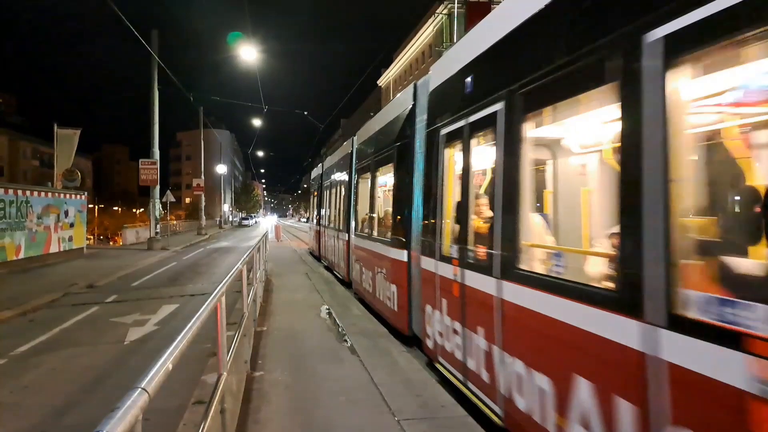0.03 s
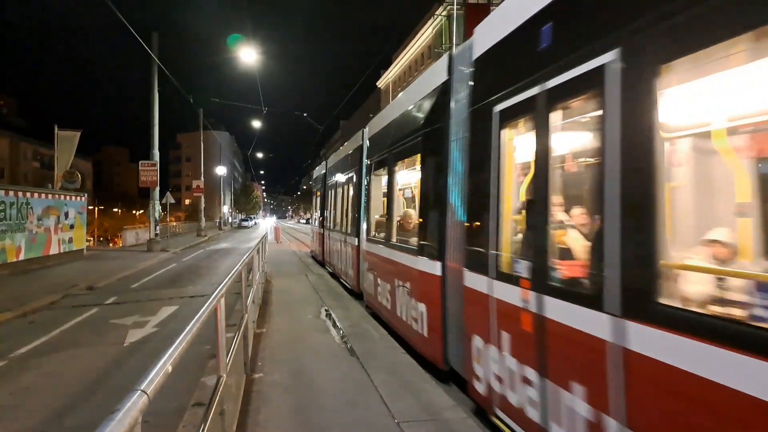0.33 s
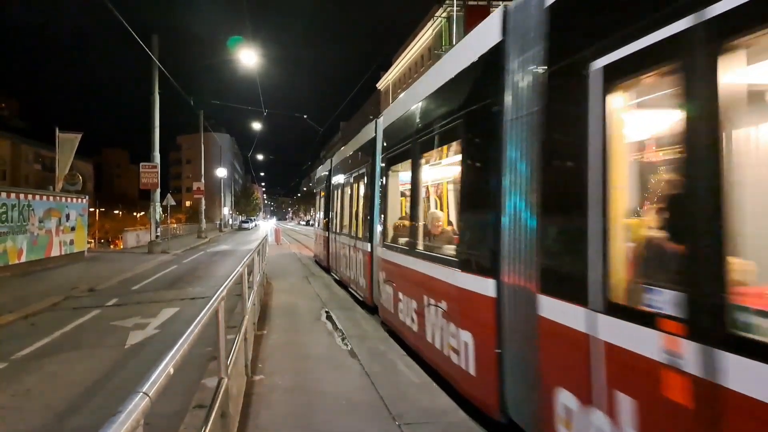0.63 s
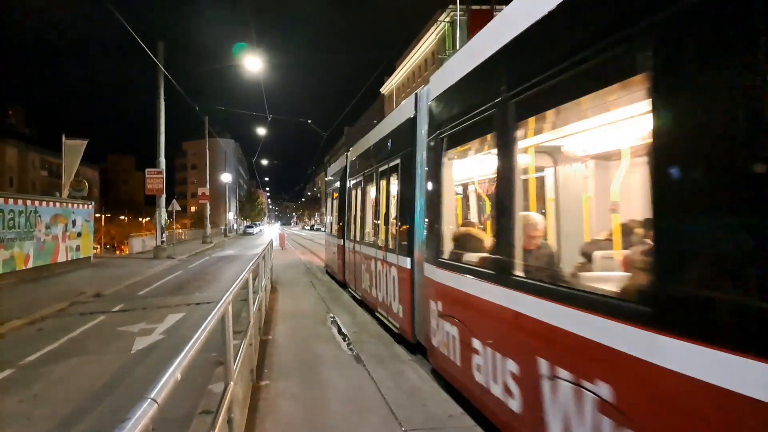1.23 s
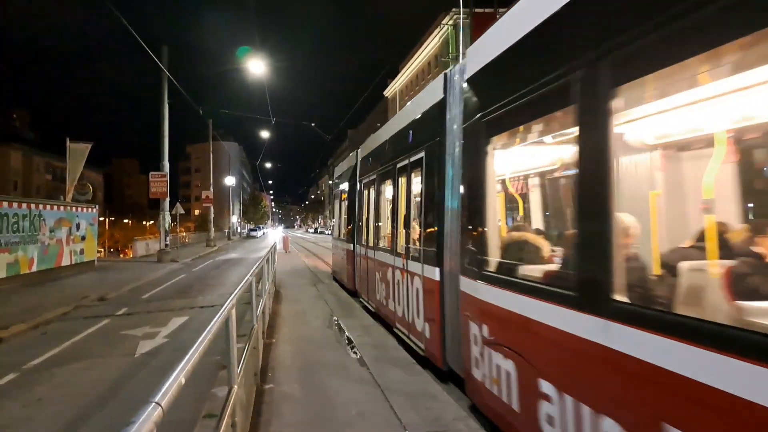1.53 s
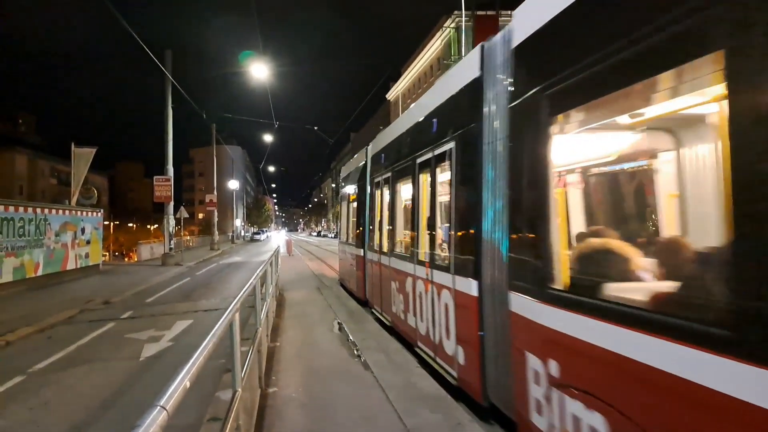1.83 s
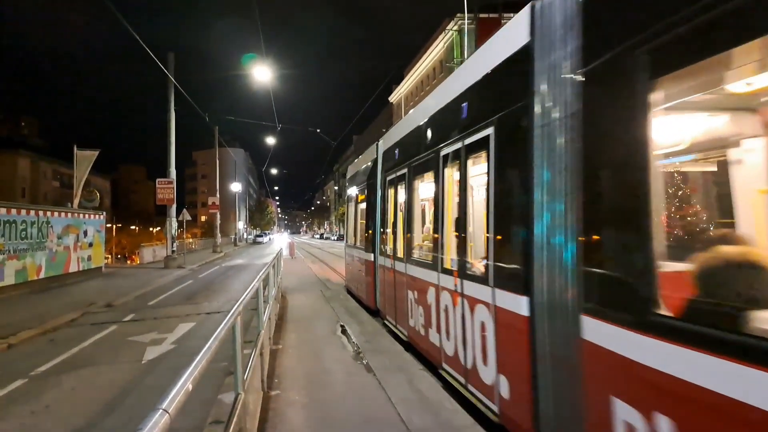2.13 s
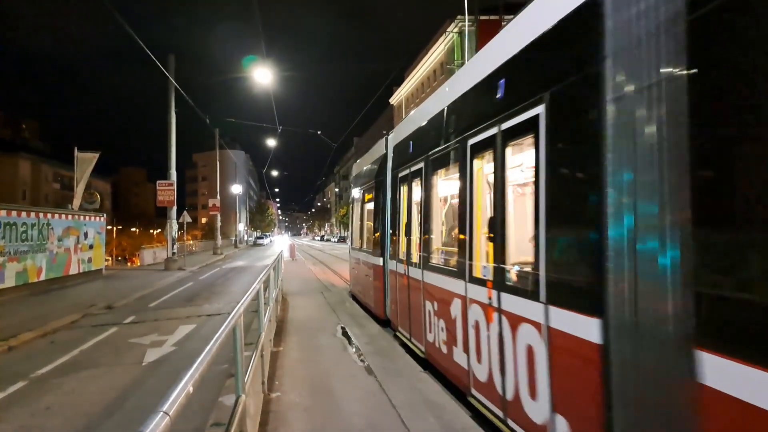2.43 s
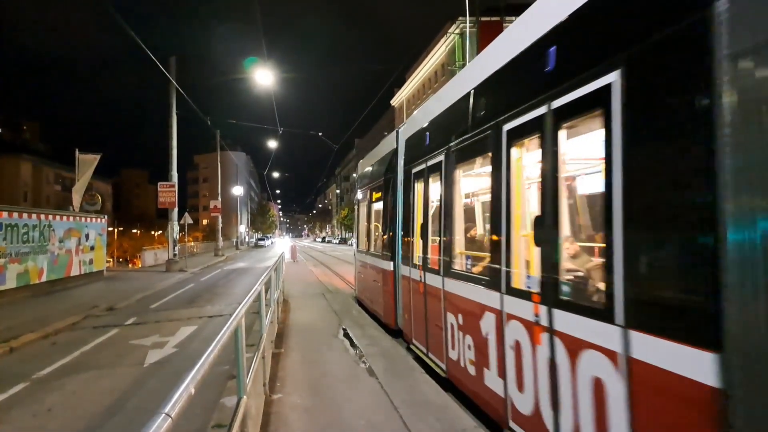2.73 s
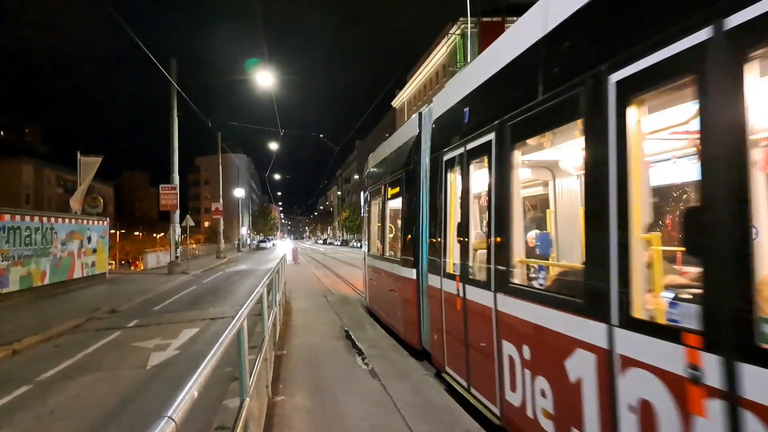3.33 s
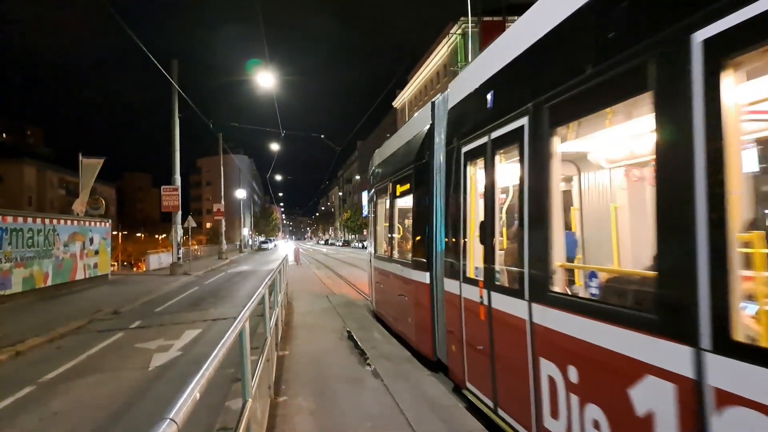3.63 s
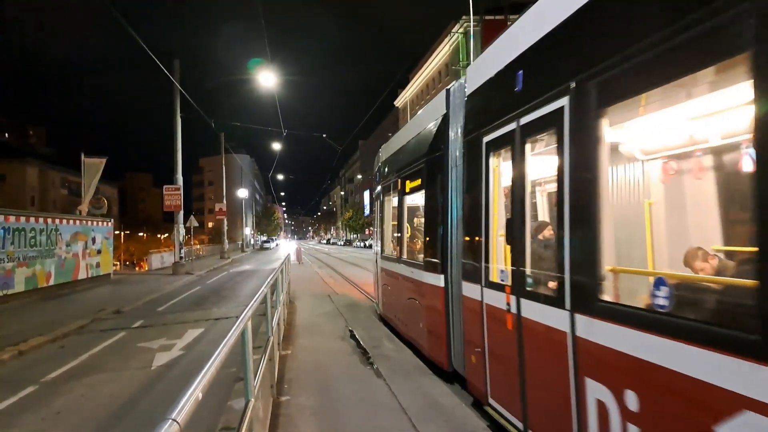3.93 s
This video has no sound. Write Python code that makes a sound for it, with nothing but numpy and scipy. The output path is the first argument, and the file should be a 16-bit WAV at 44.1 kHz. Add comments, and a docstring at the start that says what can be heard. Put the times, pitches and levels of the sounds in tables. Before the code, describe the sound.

A tram rolls past close by on a quiet street at night, rumbling and hissing over a motor hum. Its wheels knock a few times, then a thin, fluttering squeal and high sizzle build over low throbs.

```python
"""A long tram rolls past close by in a quiet street at night.
The track rumbles, the wheels roar on the hissing rail and the motor hums. A set of wheels knocks
a few times as it draws level, and the car body booms in throbs. The flanges (the wheels' guiding rims)
scrape along the rail and rub the wheels into a thin, fluttering squeal with a high sizzle."""
import sys
import numpy as np
from scipy import signal
from scipy.fft import rfft, irfft
from scipy.io import wavfile

SR = 44100
rng = np.random.default_rng(int(sys.argv[2]) if len(sys.argv) > 2 else 0)


def wav_out(sig):
    """Save sig, one row per channel (or a flat mono array), as 16-bit PCM at SR to the path in sys.argv[1]."""
    wavfile.write(sys.argv[1], SR, np.round(np.clip(np.atleast_2d(sig).T, -1, 1) * 32767).astype(np.int16))


N = 4 * SR


def undb(db):
    """Turn decibels into a gain."""
    return 10 ** (np.asarray(db) / 20)


def unit(x):
    """Scale a signal to an average power of 1."""
    return x / np.sqrt(np.mean(np.abs(x) ** 2))


def swell(curve):
    """Gain over time through points of t/s, level/dB."""
    return undb(np.interp(np.arange(N) / SR, *np.array(curve).T))


def drift(rate_hz):
    """A smooth random wobble of typical size 1, mostly slower than rate_hz."""
    f = np.fft.rfftfreq(N, 1 / SR)
    return unit(irfft(rfft(rng.standard_normal(N)) * (f > 0) / (1 + (f / rate_hz) ** 4), N))


def pan(db):
    """Left and right gains, with the left louder by db."""
    return unit(undb(np.array([[db], [-db]]) / 2))


def noise(spectrum, likeness=0):
    """Complex stereo noise (abs gives its strength); likeness near 1 makes both sides alike."""
    a, b = rfft(rng.standard_normal((2, N)))
    mid, side = a * np.sqrt(1 + likeness), b * np.sqrt(1 - likeness)
    return unit(np.fft.ifft(np.array([mid + side, mid - side]) * spectrum, N)) * np.sqrt(2)


def resonances(modes):
    """A spectrum with a peak for each mode (a pitch at which a part likes to ring)."""
    f = np.fft.rfftfreq(N, 1 / SR) + 1
    powers = (undb(db) ** 2 / width / (1 + ((f - hz * hz / f) / width) ** 2) ** 2
              for hz, width, db in modes)
    return np.sqrt(sum(powers))


def rush(colour, curve, likeness, pan_db, flicker_db, rate_hz):
    """Contact noise whose level flickers with the roughness of the rail."""
    hz, db = np.array(colour).T
    spectrum = undb(np.interp(np.log(np.fft.rfftfreq(N, 1 / SR) + 1), np.log(hz), db))
    return noise(spectrum, likeness).real * swell(curve) * pan(pan_db) * undb(flicker_db * drift(rate_hz))


def sing(modes, curve, steady, pan_db, flutter_db):
    """Rubbing makes a wheel ring and partly evens out its swing (more so as steady rises)."""
    ring = noise(resonances(modes))
    evened = unit(ring.real / np.abs(ring) ** steady)
    return evened * swell(curve) * pan(pan_db) * undb(flutter_db)


def tone(hz, curve, waver, flicker_db):
    """A pure tone that wavers in pitch and flickers in level."""
    phase = 2 * np.pi * np.cumsum(hz * (1 + waver * drift(9))) / SR
    return np.sqrt(2) * np.sin(phase) * swell(curve) * undb(flicker_db * drift(19.5))


def rolling():
    """As the tram rolls, the track bed rumbles, the wheels roar and the rail hisses."""
    # tone colour of each noise: f/Hz, relative level/dB
    rumble = [(20, -28), (30, -12), (42, -6), (60, 1.5), (95, -2.5), (130, -0.5), (165, -5.5), (210, -6),
              (260, -11), (320, -11.5), (450, -24), (700, -34), (1400, -71.5)]
    roar = [(150, -13), (315, 4.5), (400, 0.5), (490, -1.5), (570, 0), (630, 2), (730, -3.5), (900, -3),
            (1250, -10.5), (1650, -7.5), (2100, -10), (2700, -13), (3300, -18), (6000, -30.5),
            (12000, -48.5)]
    hiss = [(2000, -17), (3300, -13), (3900, 3), (4350, 1), (4900, -7.5), (5600, -10.5), (6400, -25),
            (8000, -25), (10000, -30.5), (12500, -23), (15500, -37)]
    # their loudness over time: t/s, level/dB
    rumble_db = [(0, -22), (.7, -23), (1.5, -23.5), (1.85, -23), (2.2, -22), (3, -23), (3.4, -25.5),
                 (4, -25.5)]
    roar_db = [(0, -32), (.6, -34.5), (1.1, -35.5), (1.8, -32.5), (2.5, -35), (3.1, -37), (4, -39)]
    hiss_db = [(0, -38), (.2, -39), (.5, -44.5), (1.25, -46.5), (1.5, -44), (2.5, -46), (4, -50)]
    return (rush(rumble, rumble_db, likeness=.9, pan_db=.5, flicker_db=1.3, rate_hz=8.2)
            + rush(roar, roar_db, likeness=-.022, pan_db=.7, flicker_db=.5, rate_hz=4.7)
            + rush(hiss, hiss_db, likeness=.042, pan_db=6.5, flicker_db=.5, rate_hz=9.9))


def motor():
    """The motor hums; a higher whine fades as a set of wheels moves away."""
    # loudness of hum and whine: t/s, level/dB
    hum_db = [(0, -26.5), (.12, -25.5), (.25, -41), (.42, -32), (.9, -36), (1.2, -32.5), (1.5, -35),
              (1.7, -27), (1.95, -28), (2.15, -51), (2.7, -43.5), (3.05, -30), (3.25, -50), (4, -60)]
    whine_db = [(0, -33.5), (.15, -39.5), (.3, -45), (.7, -54), (4, -87)]
    return (tone(hz=261.5, curve=hum_db, waver=.0086, flicker_db=2)
            + tone(hz=484, curve=whine_db, waver=.0194, flicker_db=3))


def leaving_wheels():
    """At the start, wheels that are moving away ring and quickly fade."""
    # wheel modes: f/Hz, width/Hz, relative level/dB
    modes = [(4322, 31, 0), (4440, 79, -8)]
    # their fade: t/s, level/dB
    ring_db = [(0, -46), (.1, -41), (.3, -54), (.5, -64), (4, -80)]
    return sing(modes, ring_db, steady=.2, pan_db=0, flutter_db=.92 * drift(14))


def knocks():
    """A passing set of wheels gives dull knocks, each a short burst of low noise."""
    # knocks: t/s, level/dB, f/Hz
    hits = [(.66, -26.5, 335), (.725, -30, 335), (1.624, -18, 260), (1.794, -14.5, 172),
            (1.914, -17.5, 122), (2.292, -20.5, 295)]
    rise_s, decay_s, width_share = .012, .016, .37
    t, total = np.arange(N) / SR, 0
    for at, db, hz in hits:
        band = noise(resonances([(hz, hz * width_share, 0)]), likeness=.83)
        evened = unit(band.real / np.abs(band) ** .5)
        rise = np.clip((t - at) / rise_s, 0, 1)
        decay = np.exp(-np.maximum(t - at - rise_s, 0) / decay_s)
        total += evened * rise * decay * undb(db)
    return total


def flanges():
    """Flanges scrape along the rail and set the wheels squealing, fluttering as they grip and slip."""
    # tone colour of the scrape: f/Hz, relative level/dB
    scrape = [(2000, 1), (3500, -9.5), (4700, -1.5), (5400, -1.5), (6300, -13), (7700, -21), (8500, -13.5),
              (9200, -20), (12000, -12), (16000, -33)]
    # wheel modes that sing together: f/Hz, width/Hz, relative level/dB
    squeal = [(2774.3, 45, -4), (2689, 35, -14)]
    octave = [(5552, 52, -4.5), (5498, 38, -9.5), (5653, 35, -12), (4650, 43, -19.5)]
    shriek = [(4173, 146, 5), (6970, 190, -17)]
    rub = [(2472, 93, 2), (3330, 120, -1), (3425, 60, -6)]
    grind = [(1668, 92, 4), (1562, 61, 1)]
    top_ring = [(11102, 35, -5), (11440, 55, 4), (11200, 120, 7)]
    whistle = [(12760, 60, -7), (12900, 50, -5), (13030, 170, 0)]
    # loudness of each over time: t/s, level/dB
    scrape_db = [(0, -78), (1.3, -55), (1.45, -44.5), (2.4, -43), (2.95, -36), (3.4, -37), (4, -37)]
    squeal_db = [(0, -51.5), (1.36, -63), (1.44, -41), (1.55, -34), (1.85, -34.5), (2.17, -33), (2.33, -34),
                 (2.5, -31), (2.82, -33), (2.92, -41), (3.2, -33.5), (3.45, -31), (3.58, -39), (4, -47.5)]
    octave_db = [(0, -78), (1.3, -62), (1.47, -48), (1.8, -44), (2.3, -51), (2.65, -47), (3, -35.5),
                 (3.3, -43.5), (3.6, -36), (3.85, -34), (4, -43)]
    shriek_db = [(0, -63), (2, -55), (2.16, -35.5), (2.5, -50.5), (2.85, -46), (3, -38.5), (3.3, -42),
                 (3.6, -38.5), (3.8, -42), (3.95, -31.5), (4, -39)]
    rub_db = [(0, -77), (2.45, -58), (2.7, -42), (3.2, -41.5), (3.55, -50), (4, -50)]
    grind_db = [(0, -56), (2.45, -53), (2.75, -47), (3.15, -41.5), (3.5, -44.5), (3.85, -45), (4, -37.5)]
    top_ring_db = [(0, -88), (1.9, -66), (2.33, -46), (2.45, -64), (2.7, -66), (3.1, -59), (3.7, -60),
                   (4, -63)]
    whistle_db = [(0, -90), (1.25, -85), (1.45, -60), (1.75, -50.5), (2.1, -54), (2.6, -60), (2.71, -48),
                  (2.88, -68), (3.2, -57), (3.6, -69), (4, -68)]
    grip = drift(45)  # squeal and rub flutter together
    return (rush(scrape, scrape_db, likeness=0, pan_db=2.5, flicker_db=1.1, rate_hz=40)
            + sing(squeal, squeal_db, steady=.28, pan_db=5.5, flutter_db=1.8 * grip)
            + sing(octave, octave_db, steady=.19, pan_db=9.5, flutter_db=1.5 * drift(5.3))
            + sing(shriek, shriek_db, steady=.067, pan_db=12, flutter_db=.59 * drift(10))
            + sing(rub, rub_db, steady=.2, pan_db=7, flutter_db=.91 * grip)
            + sing(grind, grind_db, steady=.1, pan_db=-3, flutter_db=2.1 * drift(15))
            + sing(top_ring, top_ring_db, steady=.1, pan_db=8, flutter_db=3.4 * drift(11))
            + sing(whistle, whistle_db, steady=.1, pan_db=11, flutter_db=2.5 * drift(12)))


def sizzle():
    """The same scraping stirs many high wheel modes, each swelling on its own."""
    # high modes: f/Hz, width/Hz, relative level/dB
    modes = [(7060, 140, -7.5), (7480, 250, -4.5), (8430, 300, -6.5), (9900, 130, -14), (10060, 230, -2),
             (11180, 160, -6), (11610, 260, 1), (12600, 450, 3), (13100, 240, 1), (13800, 380, 0.5),
             (14530, 260, 2), (15300, 400, -4), (15690, 90, -17)]
    # their joint loudness: t/s, level/dB
    sizzle_db = [(0, -97), (1.25, -64), (1.45, -56), (2.1, -51.5), (2.5, -52), (3.25, -48), (4, -49)]
    wander_db, flicker_db = 2.8, 1.1
    ring = sum(noise(resonances([(hz, width, 0)])).real * undb(db + wander_db * drift(4))
               for hz, width, db in modes)
    return unit(ring) * swell(sizzle_db) * pan(db=2.5) * undb(flicker_db * drift(35))


def body_boom():
    """The car body rings at one low, wandering pitch, in throbs up to about ten times a second."""
    # peak of each throb: t/s, level/dB
    throbs = [(1.829, -19), (2.067, -18), (2.261, -26), (2.39, -18.5), (2.492, -23.5), (2.65, -22),
              (2.9, -16.5), (3.0, -18.5), (3.11, -17.5), (3.205, -16), (3.29, -21.5), (3.395, -16.5),
              (3.475, -18.5), (3.576, -16.5), (3.684, -17.5), (3.938, -18.5)]
    t, throb_s = np.arange(N) / SR, .022
    hz = 66.43 + 4.2 * drift(6.2)
    loudness = sum(undb(db) * np.exp(-.5 * ((t - at) / throb_s) ** 2) for at, db in throbs)
    return np.sqrt(2) * np.sin(2 * np.pi * np.cumsum(hz) / SR) * loudness


def scene():
    """The whole tram, heard from the platform."""
    return rolling() + motor() + leaving_wheels() + knocks() + flanges() + sizzle() + body_boom()


def record(dry):
    """A steep filter cuts the highest treble."""
    top_hz = 15800
    return signal.sosfilt(signal.ellip(10, .2, 80, top_hz, fs=SR, output="sos"), dry)


dry = scene()
out = record(dry)
wav_out(out)
```